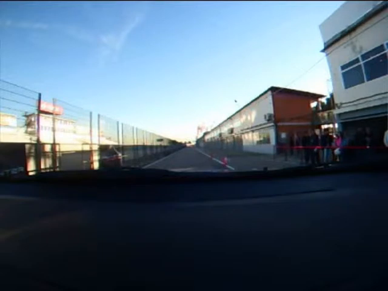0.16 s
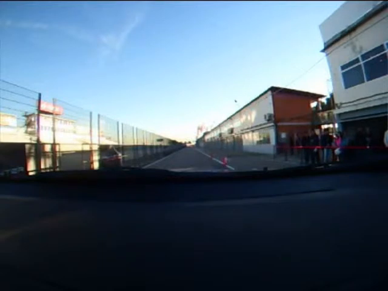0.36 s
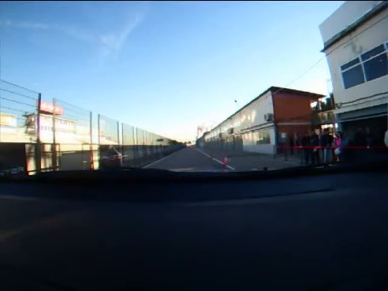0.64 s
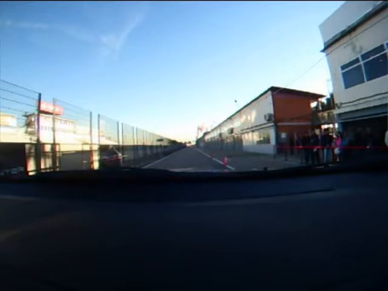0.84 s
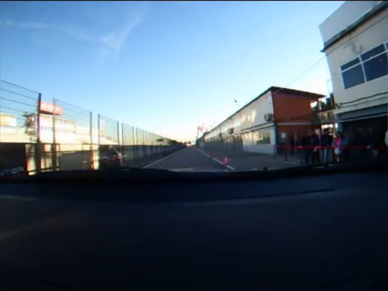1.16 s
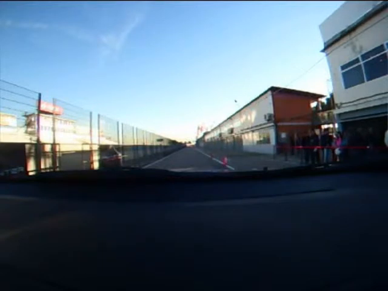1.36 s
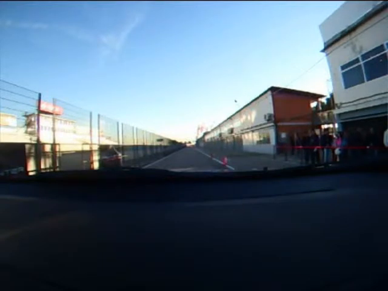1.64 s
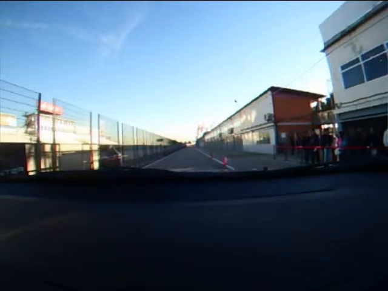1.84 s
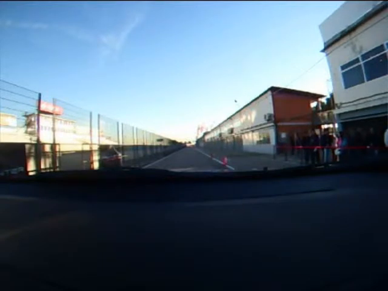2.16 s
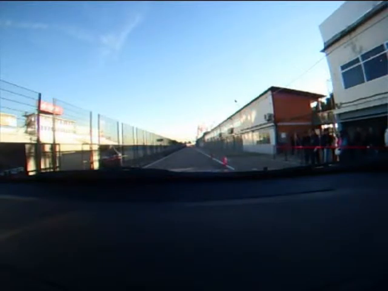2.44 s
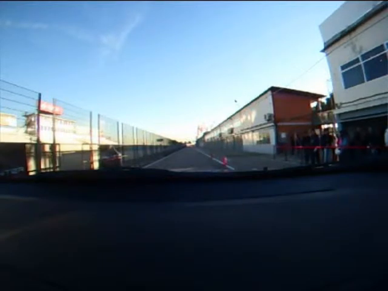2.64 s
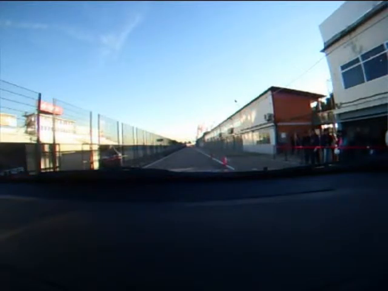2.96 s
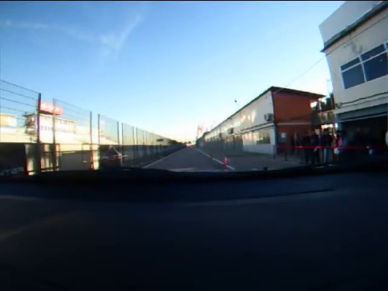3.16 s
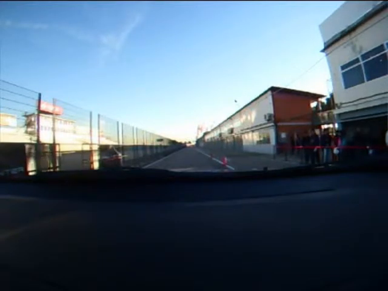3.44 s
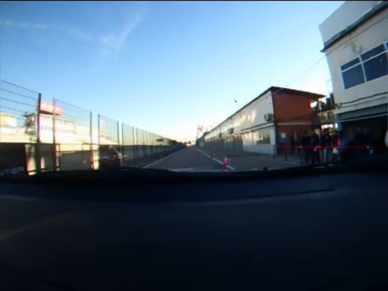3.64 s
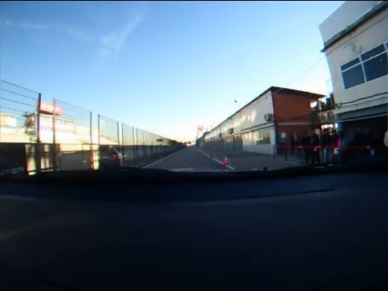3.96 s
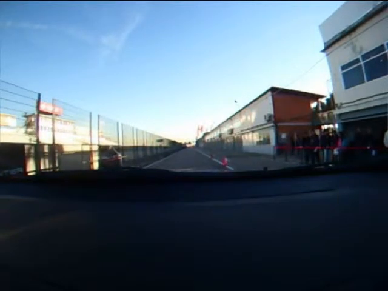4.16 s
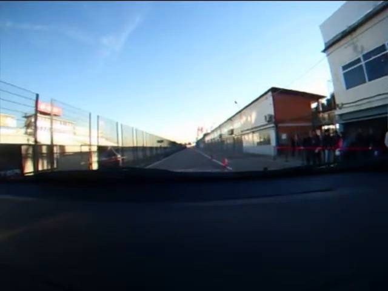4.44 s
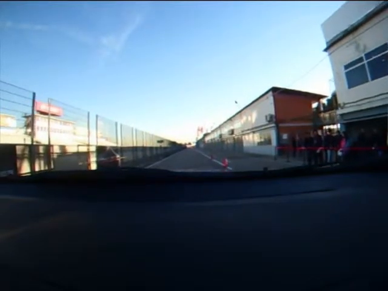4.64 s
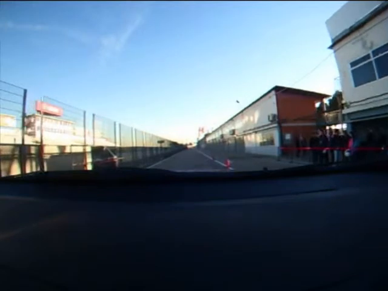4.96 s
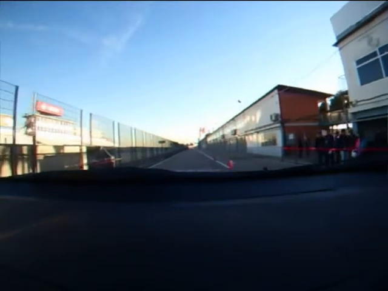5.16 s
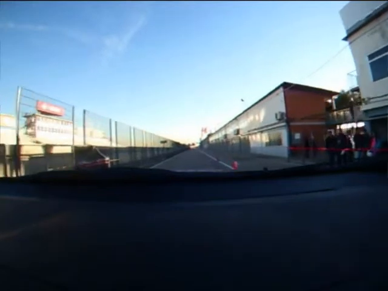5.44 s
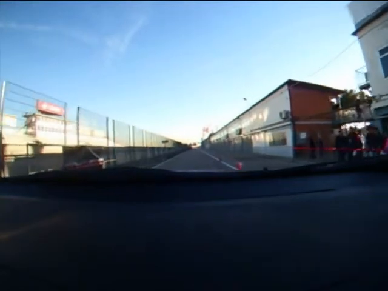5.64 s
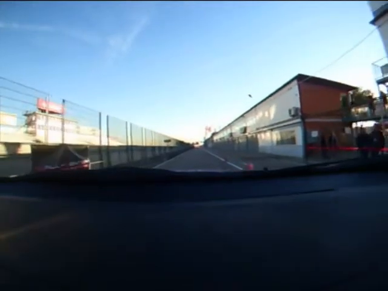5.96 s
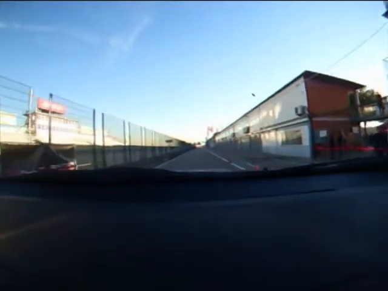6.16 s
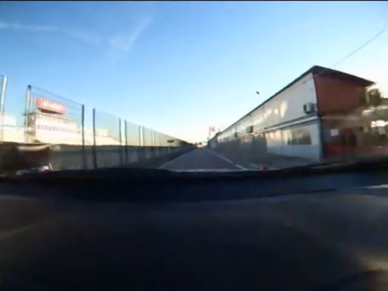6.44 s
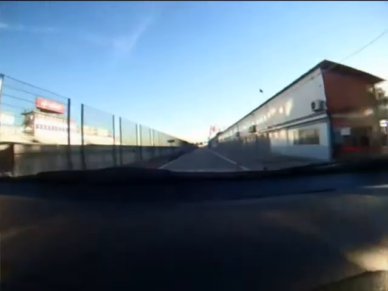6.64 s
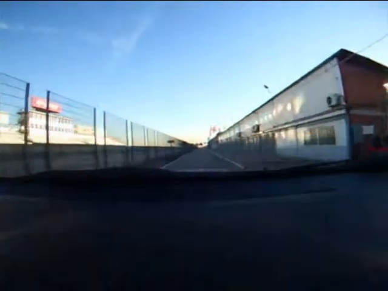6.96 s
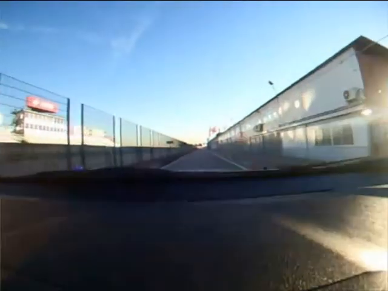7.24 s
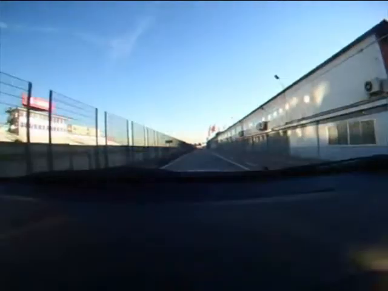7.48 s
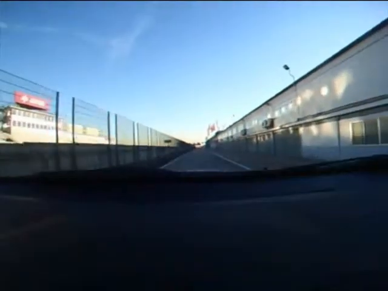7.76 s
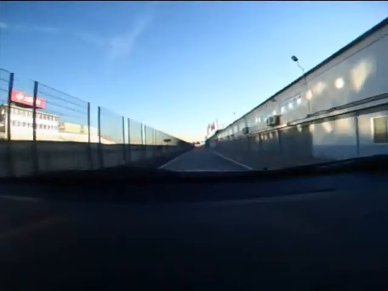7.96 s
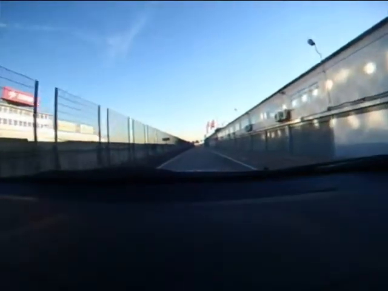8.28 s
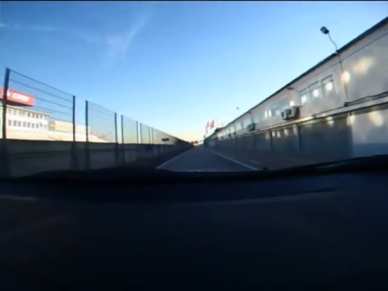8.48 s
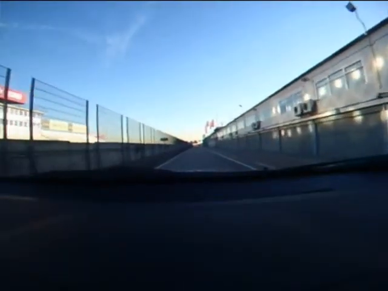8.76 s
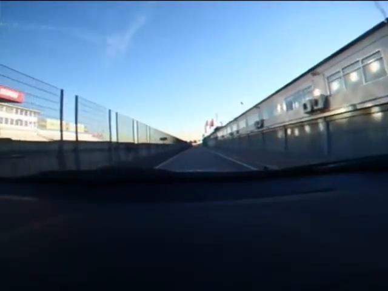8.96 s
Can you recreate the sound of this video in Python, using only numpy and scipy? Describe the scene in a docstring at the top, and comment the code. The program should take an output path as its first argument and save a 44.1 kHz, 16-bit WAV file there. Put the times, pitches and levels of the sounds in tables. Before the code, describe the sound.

A car interior: dull idle thudding, soft knocks, lugging bassy boom with buzzing loose plastic, then revs rise with tyre roar before easing off amid bumps.

```python
"""Inside a four-cylinder car: it idles over road rumble and hiss, takes two knocks in the body as it creeps off,
then a soft bump and a scuff on the dashboard. It lugs at low revs and the firing pulses boom in the closed cabin;
a loose piece of trim clacks and buzzes. It pulls up the track, the note and tyre rumble rising, and eases off
with more clacks and a heavier bump. Revs drive the harmonics, thuds and buzz; filtered noise makes road and hiss.
A dashboard camera with a low sample rate picks it up."""
import sys
import numpy as np
from scipy import signal
from scipy.fft import rfft, irfft, next_fast_len
from scipy.io import wavfile
from scipy.ndimage import map_coordinates

SR = 44100
rng = np.random.default_rng(int(sys.argv[2]) if len(sys.argv) > 2 else 0)


def dump(signal):
    """Clip the signal to [-1, 1] and save it as 16-bit WAV at the path in sys.argv[1]."""
    limited = np.clip(np.atleast_2d(signal).T, -1, 1)
    pcm = np.round(limited * 32767).astype(np.int16)
    wavfile.write(sys.argv[1], SR, pcm)


N = 401751
T = np.arange(N) / SR  # seconds

# engine speed, as cylinder firings per second: time_s, firing_hz
FIRING_RATE = [(0, 43), (1.4, 44), (1.8, 53.6), (2.35, 58.4), (3.03, 54.2), (3.3, 40.6), (3.47, 39.2),
               (3.85, 57), (4.12, 65.6), (4.3, 67.4), (4.6, 55.7), (5.36, 36.7), (5.8, 37.5), (6.7, 60.1),
               (7.3, 83.7), (8.03, 106.6), (8.25, 107.2), (8.65, 96.6), (9.11, 79.5)]
# how hard the firings drive the cabin boom: time_s, drive_db
BOOM_DRIVE = [(0, -30.5), (1.32, -29.5), (1.55, -41), (2.6, -49), (2.92, -29), (3.25, -53), (3.42, -24),
              (3.57, -14), (3.95, -25), (4.4, -22), (4.62, -14), (5.25, -10.5), (5.5, -20.5), (6.0, -11),
              (6.58, -12), (6.8, -17), (8.47, -19.5), (8.72, -36), (9.11, -32.5)]
# how readily the cabin booms at each firing rate: firing_hz, gain_db
BOOM_GAIN = [(42, -1), (57, -4.5), (65, -7), (72, -12), (84, 1), (91, -8.5), (102, -1), (108, -1)]
# brief drop-outs of the boom: centre_s, depth_db
BOOM_DIPS = [(4.48, -15), (6.705, -17.5)]
# spread of each drop-out about its centre: seconds
DIP_WIDTH_S = 0.047
# engine load, shaking harmonics and weaker orders into the cabin: time_s, drive_db
ENGINE_LOAD = [(0, -56.5), (2.3, -60.5), (3.2, -54.5), (3.9, -44), (4.62, -44.5), (5.6, -52.5), (6.6, -44),
               (7.1, -40), (7.4, -36), (7.75, -39), (8.5, -44), (9.11, -45)]
# strong firing harmonics from the second up: drive_db relative to the load
HARMONICS_DB = [5.5, 0, -4]
# cabin resonances that those harmonics sweep through: pitch_hz, gain_db
CABIN_RESONANCES = [(85, 2.5), (110, -3), (140, -5.5), (158, 2.5), (167, 10.5), (178, 13), (185, 0),
                    (191, 11), (198, 8), (206, 2), (230, 5), (250, 10), (262, 4.5), (280, 8), (305, -5.5),
                    (340, -17.5), (420, -21.5)]
# what the cabin passes of the weaker engine orders: pitch_hz, gain_db
CABIN_PASS = [(15, -20), (28, -5.5), (45, -6), (90, 0), (170, -3.5), (220, -8), (278, 2), (310, -10.5),
              (370, -28), (560, -20), (900, -42)]
# how hard uneven firings thud through the body: time_s, strike_db
THUD_DRIVE = [(0, -32), (1.2, -31), (2.0, -33.5), (3.2, -32.5), (4.0, -37), (5.5, -35.5), (6.8, -38),
              (9.11, -30)]
# engine-mount modes that the thuds ring: pitch_hz, mode_db, t60_s
MOUNT_MODES = [(105, -1, 0.047), (150, 3, 0.034), (233.3, -3.5, 0.033), (355, -10.5, 0.026),
               (514, -19, 0.018)]
# bands of noise, from whirrs to a short moan and low roars: start_s, end_s, pitch_hz, width_hz, level_db
NOISE_BANDS = [(-.6, 2.0, 3270, 160, -69.5), (3.27, 3.5, 490, 70, -52.5), (3.601, 4.9, 2600, 280, -62),
               (3.4, 4.7, 590, 170, -60), (6.5, 10, 2330, 210, -58), (6.5, 9.0, 2450, 280, -57.5),
               (6.798, 7.9, 685, 199, -57)]
# road vibration, shared by rumble, drone, roar and hiss: time_s, drive_db
ROAD_DRIVE = [(0, -46.5), (0.8, -50), (1.5, -39.5), (2.2, -41), (3.2, -39.5), (3.7, -37.5), (5.9, -34.5),
              (6.4, -31), (6.9, -29), (7.35, -24.5), (8.35, -24.5), (9.11, -29.5)]
# noise colour of the swaying cabin air: pitch_hz, gain_db
RUMBLE_COLOUR = [(12, -31), (25, -12.5), (35, -9), (42, 0.5), (50, -3.5), (65, -20), (90, -18.5),
                 (130, -39.5), (300, -90)]
# noise colour of the drumming panels: pitch_hz, gain_db
DRONE_COLOUR = [(40, -30.5), (75, -4), (105, 0), (170, -1), (220, -4.5), (275, -2), (310, -15),
                (360, -31.5), (600, -48.5), (1500, -96)]
# noise colour of the tyres: pitch_hz, gain_db
ROAR_COLOUR = [(150, -19), (300, 0.5), (400, 0), (560, -3), (750, -4), (1000, -8.5), (1400, -10.5),
               (2200, -33.5), (4000, -61.5)]
# noise colour of the engine-bay hiss: pitch_hz, gain_db
HISS_COLOUR = [(700, -13.5), (1300, -4.5), (1800, 2), (2050, 1), (2350, 0), (2850, -1.5), (3300, 0),
               (3750, -4.5), (3950, -11.5), (4200, -27), (7200, -24), (8500, -29.5), (15500, -31)]
# dull knocks in the body: start_s, strike_db
KNOCKS = [(1.232, -33), (1.2424, -13), (1.254, -33.5), (1.690, -16), (1.706, -19.5), (1.728, -24),
          (1.853, -31.5)]
# body-panel modes: pitch_hz, mode_db, t60_s
PANEL_MODES = [(133, -9.5, 0.15), (172.7, -1.5, 0.16), (232.6, 0.5, 0.053), (278.5, -12, 0.028),
               (390, -21, .04), (725, -22, .03)]
# tone of the knocks: pitch_hz, gain_db
KNOCK_COLOUR = [(50, -20.5), (110, 3), (285, 3.5), (360, -15.0), (750, -3.5), (1200, -28)]
# bumps that rock the cabin: start_s, length_s, level_db
BUMPS = [(2.782, 0.18, -19), (2.955, 0.1, -29), (8.58, 0.095, -9.5), (8.649, .16, -7.5),
         (8.796, 0.071, -14.5)]
# pitch of the cabin's lowest resonance: hertz
CABIN_HZ = 41.72
# grain of the dashboard scuff: pitch_hz, gain_db
SCUFF_COLOUR = [(900, -12), (1900, 4), (2900, 9), (3700, 3), (4200, -22), (7000, -19), (9000, -27),
                (15500, -26)]
# spells of trim buzz: start_s, end_s, seat_db (blows on its seat), stop_db (taps on its opposite stop)
BUZZES = [(4.638, 4.751, -25, -66), (4.948, 5.31, -36.5, -30), (5.79, 6.29, -18, -38.5)]
# strike at both ends of a spell, relative to its middle: dB
BUZZ_ENDS_DB = -5
# single hard clacks of the same trim: start_s, strike_db
CLACKS = [(4.751, -20), (4.792, -26), (4.830, -29.5), (4.890, -22.5), (5.02, -26), (5.065, -30),
          (5.257, -27.5), (8.091, -22), (8.119, -25.5), (8.143, -30), (8.173, -32), (8.181, -27),
          (8.211, -16), (8.659, -24.5), (8.682, -23.5), (8.7154, -11.5), (8.758, -23)]
# loose-trim modes: pitch_hz, mode_db, t60_s
TRIM_MODES = [(520, -11, 0.01), (1283, -16.5, .01), (1803, -4, 0.011), (1980, -5.5, 0.011),
              (2160, -9.5, 0.0089), (2496, -3, 0.023), (2635, -8.5, 0.013), (2750, -10.5, 0.01),
              (3078, -2.5, 0.018), (3270, -1.5, 0.0077), (3300, -12, 0.0076)]
# tone of the scraping faces: pitch_hz, gain_db
SNAP_COLOUR = [(900, -20.0), (1800, 7.0), (4500, -1), (7200, 2.5), (8500, -5), (15500, -4.5)]
# tone of the ringing trim: pitch_hz, gain_db
RATTLE_COLOUR = [(200, -21.5), (500, -8.5), (1250, -8.5), (1550, -8.5), (1780, 2.0), (3750, 2.0),
                 (4150, -25), (9000, -30.5)]
# bass that the camera mirrors into the treble: pitch_hz, gain_db
MIRRORED_BASS = [(300, 6.0), (600, -42)]
# spacing of the mirror images: hertz
CAMERA_HZ = 3900
# top of the whole sound: hertz
EDGE_HZ = 15850


def amp(db):
    """Decibels to gain."""
    return 10 ** (np.asarray(db) / 20)


def unit(x):
    """Scales to rms 1."""
    return x / np.sqrt(np.mean(x ** 2) + 1e-20)


def curve(rows):
    """Automation: a two-column table joined by straight lines over time."""
    time_s, value = np.transpose(rows)
    return np.interp(T, time_s, value)


def response(points, hz):
    """Gain of a pitch_hz, gain_db table at any frequency."""
    pitch_hz, gain_db = np.transpose(points)
    return amp(np.interp(np.log(hz + 1), np.log(pitch_hz), gain_db))


def coloured(x, points):
    """Equalises x by a pitch_hz, gain_db table."""
    size = next_fast_len(N + 8192)
    spectrum = rfft(x, size) * response(points, np.fft.rfftfreq(size, 1 / SR))
    return irfft(spectrum, size)[:N]


def noise(points):
    """Coloured noise of rms 1."""
    return unit(coloured(rng.standard_normal(N), points))


def wander(per_s):
    """Smooth random drift of rms 1, with per_s new values a second."""
    knots = rng.standard_normal(4096)
    return unit(map_coordinates(knots, [T * per_s], order=2, mode="wrap"))


def random_phase():
    """A random starting phase in radians."""
    return 2 * np.pi * rng.random()


def swell(start_s, length_s):
    """Half-sine rise and fall, silent outside its span."""
    return np.sin(np.pi * np.clip((T - start_s) / length_s, 0, 1))


def strikes(times_s, db):
    """One impulse for each blow."""
    train = np.zeros(N)
    samples = np.round(np.asarray(times_s) * SR).astype(int)
    np.add.at(train, np.clip(samples, 0, N - 1), amp(db))
    return train


def ring(train, modes):
    """Blows ring a set of damped modes, whose joint peak is 1."""
    t = T[:8192]
    tone = sum(amp(db - 60 * t / t60_s) * np.sin(2 * np.pi * hz * t) for hz, db, t60_s in modes)
    return signal.oaconvolve(train, tone / abs(tone).max())[:N]


def boom_level(firing_hz):
    """Gain of the boom: its drive, times the cabin's response at the firing rate, less the brief dips."""
    dips_db = sum(db * np.exp(-.5 * ((T - s) / DIP_WIDTH_S) ** 2) for s, db in BOOM_DIPS)
    return amp(curve(BOOM_DRIVE) + dips_db) * response(BOOM_GAIN, firing_hz)


def engine(firings, firing_hz, boom, flutter_db=1.54, boom_flutter_db=1.0, overtone_db=-23.0,
           half_db=-4, rough=0.45, idle_jitter=0.7, jitter=0.1, steady_hz=50):
    """Four strong firing harmonics over a comb of weak, unsteady crankshaft orders."""
    angle = 2 * np.pi * firings
    boom_wave = np.cos(angle) + amp(overtone_db) * np.cos(2 * angle)
    out = boom * amp(boom_flutter_db * wander(25)) * boom_wave
    shake = amp(curve(ENGINE_LOAD))
    # combustion is uneven at low revs and steadies as they rise (radians)
    unsteady = jitter + idle_jitter / (1 + (firing_hz / steady_hz) ** 10)
    for k, db in enumerate(HARMONICS_DB, 2):
        phase = k * angle + unsteady * wander(18) + random_phase()
        level = shake * amp(db + flutter_db * wander(22))
        out += level * response(CABIN_RESONANCES, k * firing_hz) * np.cos(phase)
    # unequal cylinders add lines halfway between harmonics; from 9 up the comb holds the harmonics too
    for k in [1, 3, 5, 7, *range(9, 21)]:
        phase = k * angle / 2 + unsteady * wander(18) + random_phase()
        line = np.cos(phase) * (1 + rough * wander(14))
        level = shake * amp(half_db * (k % 2))  # half_db applies to the halfway lines only
        out += level * response(CABIN_PASS, k * firing_hz / 2) * line
    return np.sqrt(2) * out


def chug(firings, spread_db=3.5, scatter_s=0.003):
    """Firings of unequal strength and timing thud through the engine mounts."""
    at = np.flatnonzero(np.diff(np.floor(firings)) > 0)
    size, lag = rng.standard_normal((len(at), 2)).T
    strike_db = curve(THUD_DRIVE)[at] + spread_db * np.minimum(size, 1.8)
    return ring(strikes(at / SR + scatter_s * lag, strike_db), MOUNT_MODES)


def noise_bands():
    """Whirrs, a short moan and low roars: bands of noise of fixed pitch that swell and fade in their spells."""
    size = next_fast_len(N)
    out, f = np.zeros(N), np.fft.rfftfreq(size, 1 / SR)
    for start_s, end_s, hz, width_hz, db in NOISE_BANDS:
        band = np.exp(-2 * ((f - hz) / width_hz) ** 2) * np.exp(2j * np.pi * rng.random(len(f)))
        shape = np.sqrt(abs(swell(start_s, end_s - start_s)))
        out += amp(db) * shape * unit(irfft(band, size)[:N])
    return out


def road(rumble_db=-1.0, drone_db=-4.0, lumpy_db=2.5, steadiness=0.22):
    """The road rocks the cabin air at its lowest resonance and drums on the panels."""
    sway = signal.hilbert(noise(RUMBLE_COLOUR), next_fast_len(N))[:N]
    # the dampers even out the largest swings
    sway = unit(sway.real / (abs(sway) + .3) ** steadiness)
    drone = unit(noise(DRONE_COLOUR) * amp(lumpy_db * wander(30)))
    return amp(curve(ROAD_DRIVE)) * (amp(rumble_db) * sway + amp(drone_db) * drone)


def stirred(boom, rest_db, boom_db, road_db):
    """Gain of a noise that has a resting level and grows with the boom and with the road."""
    from_road = amp(road_db + curve(ROAD_DRIVE))
    return np.sqrt(amp(rest_db) ** 2 + (amp(boom_db) * boom) ** 2 + from_road ** 2)


def rush(firings, boom, throb=0.18, flicker_db=1.0):
    """Tyre roar, and hiss from the engine bay that throbs with each firing."""
    roar_level = stirred(boom, rest_db=-54.5, boom_db=-39, road_db=-28)
    roar = roar_level * amp(flicker_db * wander(35)) * noise(ROAR_COLOUR)
    hiss_level = stirred(boom, rest_db=-56.5, boom_db=-38, road_db=-28.5)
    hiss = hiss_level * amp(flicker_db * wander(50)) * noise(HISS_COLOUR)
    return roar + (1 + throb * np.cos(2 * np.pi * firings)) * hiss


def body():
    """Knocks ring the panels; bumps swell the cabin's lowest resonance."""
    knocks = coloured(ring(strikes(*np.transpose(KNOCKS)), PANEL_MODES), KNOCK_COLOUR)
    rocking = sum(amp(db) * swell(start_s, length_s) for start_s, length_s, db in BUMPS)
    return knocks + rocking * np.sin(2 * np.pi * CABIN_HZ * T)


def scuff(centre_s=2.968, width_s=0.0097, level_db=-41):
    """Something small slides briefly on the dashboard: a short puff of gritty noise."""
    shape = np.exp(-.5 * ((T - centre_s) / width_s) ** 2)
    return amp(level_db) * shape * noise(SCUFF_COLOUR)


def buzz(firings, lead_s=0.0011, spread_db=1.5):
    """Trim hits its seat just ahead of the boom's troughs and its opposite stop just ahead of the crests."""
    troughs = np.flatnonzero(np.diff(np.floor(firings + .5)) > 0) / SR - lead_s
    crests = np.flatnonzero(np.diff(np.floor(firings)) > 0) / SR - lead_s
    blows = np.zeros(N)
    for times, side in (troughs, 0), (crests, 1):
        uneven_db = spread_db * rng.standard_normal(len(times))
        for start_s, end_s, *sides_db in BUZZES:
            place = 2 * (times - start_s) / (end_s - start_s) - 1  # -1 to 1 across the spell
            inside = abs(place) < 1
            strike_db = sides_db[side] + BUZZ_ENDS_DB * place ** 2 + uneven_db
            blows += strikes(times[inside], strike_db[inside])
    return blows


def trim(firings, chatter=0.055, chatter_s=0.0023, rebound_s=0.0033, rebound_db=-13, snap_db=-25):
    """Loose plastic buzzes and clacks; after each blow it chatters briefly and rebounds."""
    blows = strikes(*np.transpose(CLACKS)) + buzz(firings)
    blows += amp(rebound_db) * np.roll(blows, round(rebound_s * SR))
    # the two faces scrape for a moment after each blow
    scrape_level = signal.lfilter([1], [1, -np.exp(-1 / (chatter_s * SR))], blows)
    contact = scrape_level * rng.standard_normal(N)
    snap = coloured(contact, SNAP_COLOUR)
    rattle = coloured(ring(blows + chatter * contact, TRIM_MODES), RATTLE_COLOUR)
    return rattle + amp(snap_db) * snap


def scene():
    """The firing rate drives the engine note, the thuds, the hiss and the buzz."""
    firing_hz = curve(FIRING_RATE)
    firings = np.cumsum(firing_hz) / SR  # running count
    boom = boom_level(firing_hz)
    car = engine(firings, firing_hz, boom) + chug(firings) + noise_bands()
    ride = road() + rush(firings, boom)
    events = body() + scuff() + trim(firings)
    return (car + ride + events)[None]


def record(dry, image_db=-19, image_fall_db=-2):
    """The camera's low sample rate mirrors the bass as faint treble whistles; a low-pass then tops the sound."""
    slope = np.gradient(coloured(dry[0], MIRRORED_BASS))
    carriers = sum(amp(image_db + image_fall_db * k) * np.cos(2 * np.pi * k * CAMERA_HZ * T)
                   for k in range(1, 5))
    low_pass = signal.firwin(511, EDGE_HZ, window=("kaiser", 9), fs=SR)
    return signal.oaconvolve(dry + slope * carriers, low_pass[None], "same")


dry = scene()
out = record(dry)
dump(out)
```